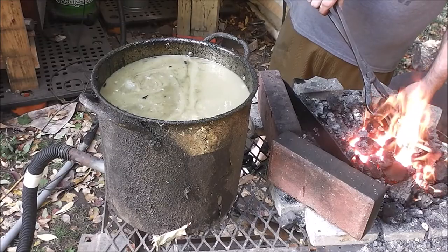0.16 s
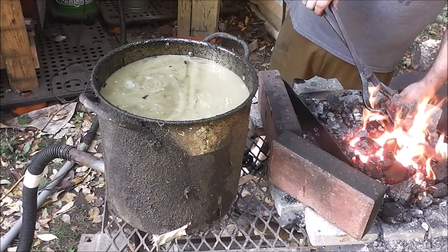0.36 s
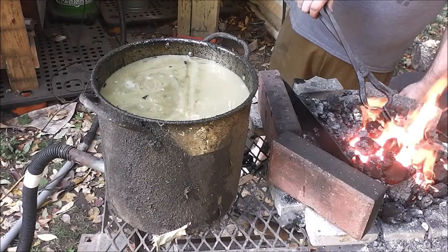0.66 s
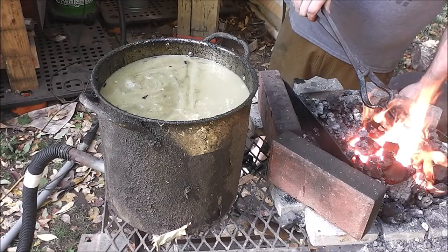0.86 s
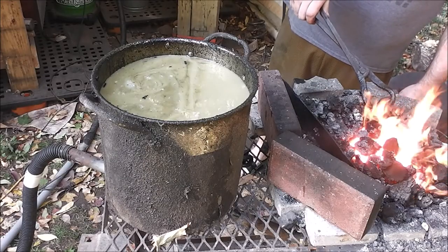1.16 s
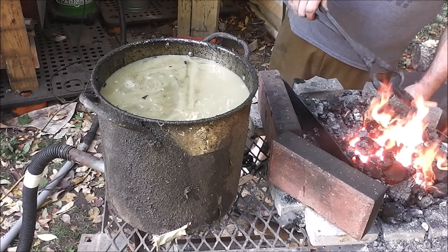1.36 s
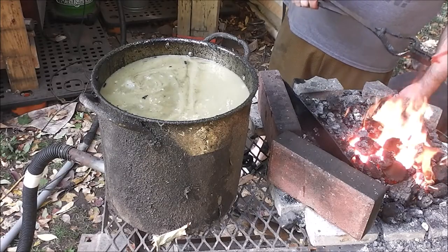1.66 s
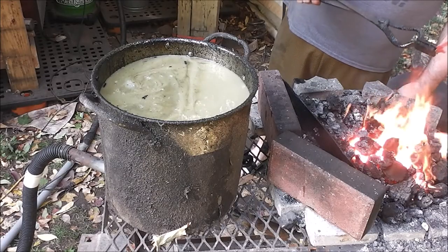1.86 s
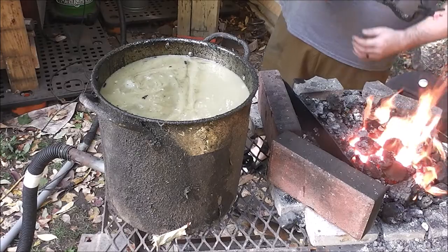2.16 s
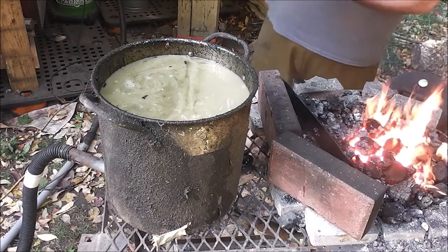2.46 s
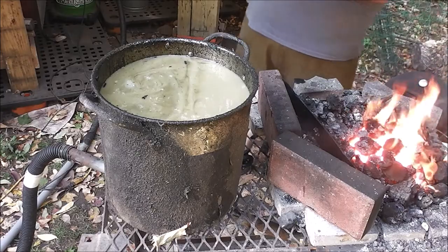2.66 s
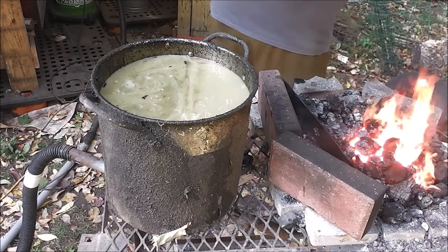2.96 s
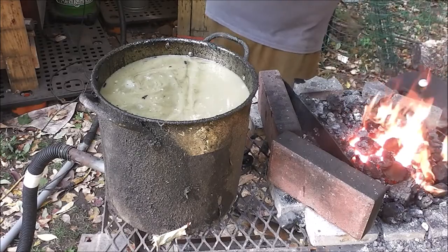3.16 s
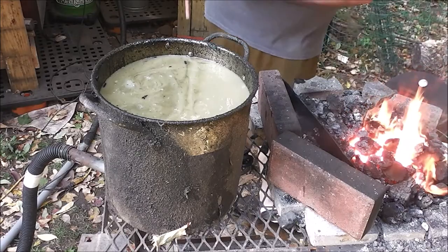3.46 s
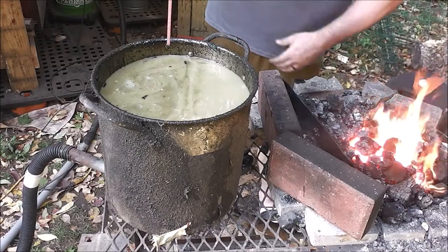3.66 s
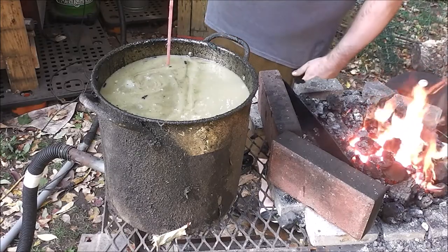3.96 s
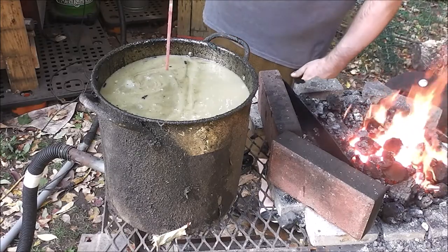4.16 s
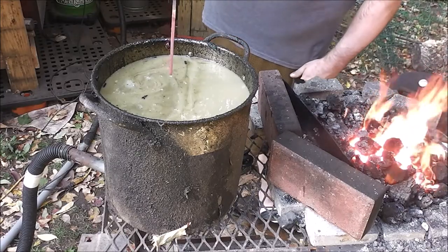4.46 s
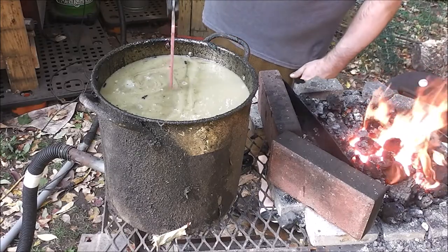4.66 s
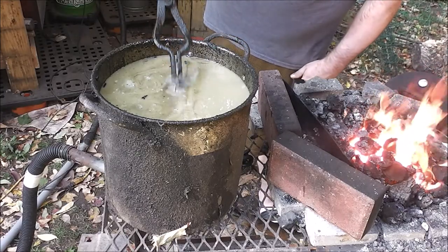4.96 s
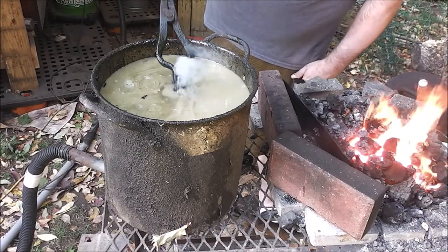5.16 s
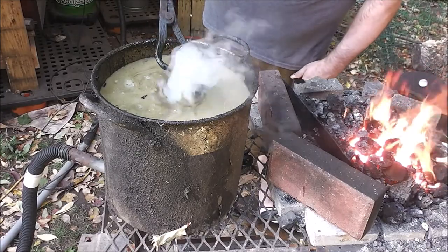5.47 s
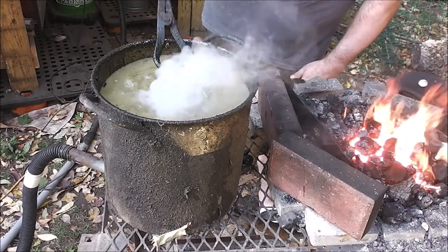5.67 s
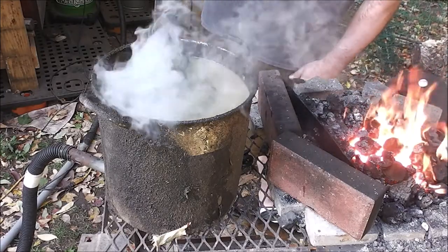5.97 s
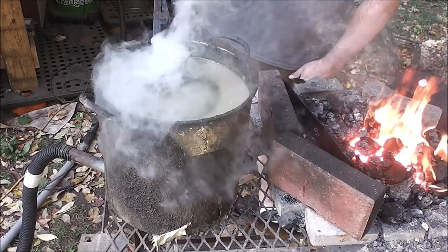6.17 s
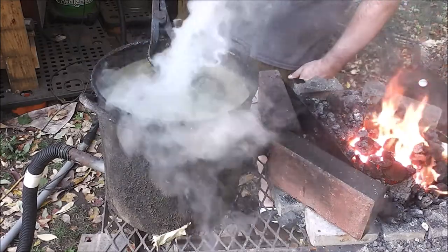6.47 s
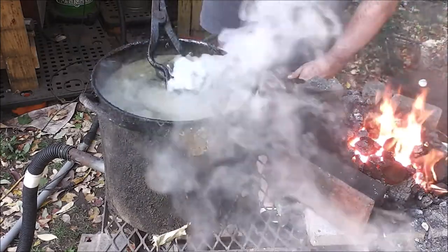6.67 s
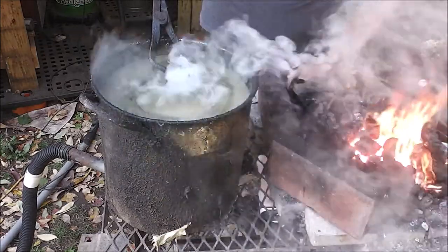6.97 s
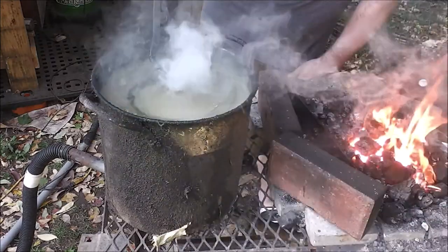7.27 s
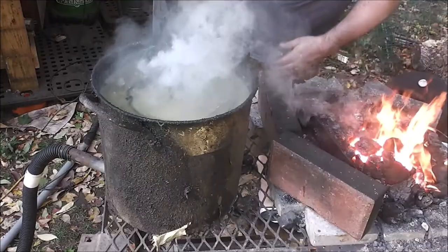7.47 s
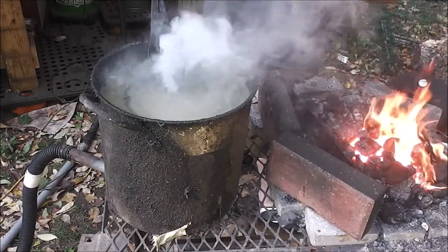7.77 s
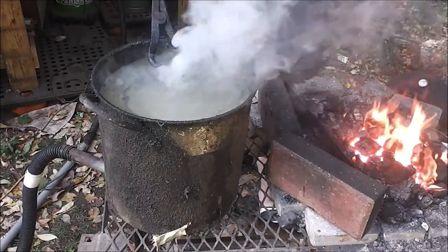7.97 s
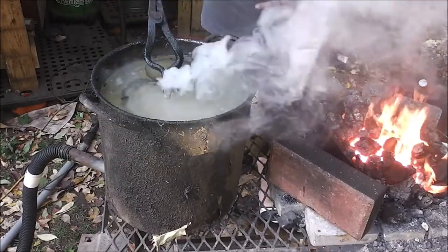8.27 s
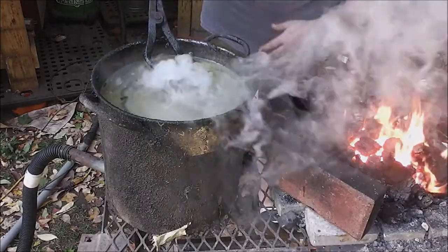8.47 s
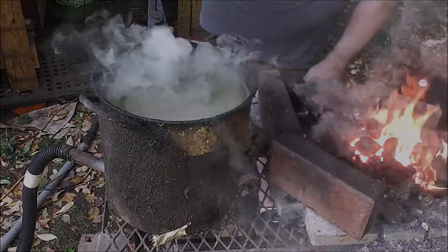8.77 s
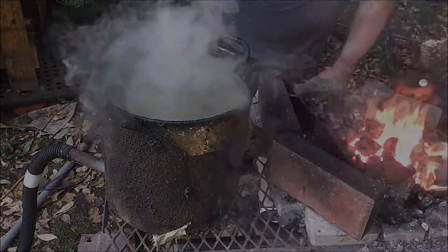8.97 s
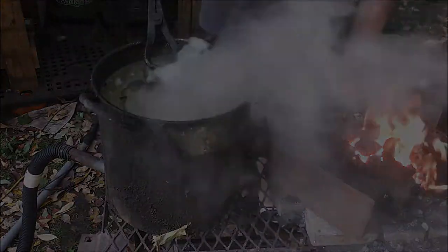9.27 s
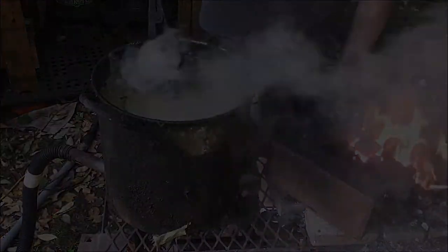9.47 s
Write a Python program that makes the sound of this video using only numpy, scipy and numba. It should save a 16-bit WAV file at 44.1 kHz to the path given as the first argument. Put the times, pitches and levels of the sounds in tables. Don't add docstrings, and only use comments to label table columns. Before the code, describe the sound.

A steady mid-pitched blower tone dominates, barely wavering, over soft air rush and nozzle hiss. After almost five seconds hot metal enters a pot of oil with a small tick, then the oil surges into crisp frying sizzle and dense sharp pops close to the microphones. Dry open-air stereo, gain dipping after the loudest cracks, with a long fade to silence.

```python
import sys
import numpy as np
from scipy import signal
from scipy.fft import rfft, irfft, next_fast_len
from scipy.io import wavfile
from scipy.ndimage import uniform_filter1d
from numba import njit

SR = 44100
rng = np.random.default_rng(int(sys.argv[2]) if len(sys.argv) > 2 else 0)


def dump_mix(stems):
    frames = np.atleast_2d(stems).T
    limited = np.clip(frames, -1, 1)
    pcm = np.round(limited * 32767).astype(np.int16)
    wavfile.write(sys.argv[1], SR, pcm)


def amplitude_ratio(level_db):
    exponent = np.asarray(level_db, float) / 20
    return 10 ** exponent


N = 423801
SIZE = next_fast_len(N)
TIME = np.arange(N) / SR
FREQ = np.arange(1, SIZE // 2 + 2) * SR / SIZE
RUSH_DB = -31.5


def walk(rate_hz):
    hold = int(SR / rate_hz)
    steps = np.repeat(rng.standard_normal(N // hold + 1), hold)
    slewed = uniform_filter1d(uniform_filter1d(steps, hold), hold)
    return 1.3 * slewed[:N]


def shape(points):
    hz, value = np.transpose(points)
    return np.interp(np.log(FREQ), np.log(hz + 1), value)


def colour(noise, points, lo_hz, hi_hz):
    spectrum = rfft(noise, SIZE) * amplitude_ratio(shape(points))
    inside = np.abs(spectrum[..., (FREQ > lo_hz) & (FREQ < hi_hz)]) ** 2
    power = 2 * inside.sum(axis=-1, keepdims=True) / SIZE / N
    return irfft(spectrum, SIZE)[..., :N] / np.sqrt(power)


# (frequency [Hz], left minus right [dB])
LOUDER = [(30, -2), (110, -.9), (200, -.3), (380, -.8), (582, .3), (800, .1), (1200, 1.9), (2000, 2.5),
          (4200, 1.4), (7300, 4), (9300, 4.6), (10300, 6.6), (12300, .3), (15000, -.3)]
# (frequency [Hz], lead of the left [rad])
LEAD = [(0, 0), (200, .1), (580, .33), (1500, .25), (3960, -.1), (7750, 0), (8530, .5), (9500, -.4),
        (11100, -1.5), (13600, -.9), (15400, -.1)]


def microphones(direct, scattered, alike):
    lead = np.interp(FREQ, *np.transpose(LEAD))
    half = amplitude_ratio(shape(LOUDER) / 2) * np.exp(0.5j * lead)
    left = rfft(direct, SIZE)
    right = alike * left + np.sqrt(1 - alike ** 2) * rfft(scattered, SIZE)
    return irfft(np.array([left * half, right / half]), SIZE)[:, :N]


# (time [s], blade level [dB], second harmonic [dB], housing tone [dB], third harmonic [dB])
STANCE = [
    (0, -8, -33, -31, -36.5),
    (.6, -7.5, -29, -31, -39),
    (2.3, -8.1, -40, -33, -37),
    (2.55, -7.7, -25, -35, -37),
    (3.2, -7.5, -29, -34.5, -49),
    (4.1, -7, -28, -37, -40.5),
    (4.85, -8, -30, -35.5, -41),
    (5.4, -8, -34.5, -36.5, -48),
    (7.7, -7, -32, -35.5, -42.5),
    (8.55, -7.5, -29.5, -35.5, -43),
]


def stance():
    shift_s = 0.25
    s, *levels = np.transpose(STANCE)
    held = np.array(levels)[:, np.searchsorted(s[1:], TIME)]
    return uniform_filter1d(held, int(shift_s * SR), mode="nearest")


# (time [s], blade rate [Hz])
SPEED = [
    (0, 580.55),
    (.9, 581.3),
    (2.1, 581.8),
    (3.5, 581.95),
    (4.7, 582.3),
    (5.3, 581.9),
    (7.5, 581.3),
    (8.8, 582.0),
    (9.6, 581.75),
]
# (multiple of blade rate, level over the air rush [dB])
BLADE = [(4, -21), (6, -16), (8, -18), (11, -21), (14, -23), (21, -25)]
# (frequency [Hz], wobble [Hz], level over the air rush [dB])
MOTOR = [(120, 4, -19), (1662, 4, -17), (4519, 3, -18), (4760, 3, -18), (5084, 5, -18)]


def blower_tones():
    housing_ratio = 2.613
    blade_hz = np.interp(TIME, *np.transpose(SPEED))
    turn = 2 * np.pi * np.cumsum(blade_hz + 0.084 * walk(6)) / SR
    blade_db, second_db, housing_db, third_db = stance()
    out = amplitude_ratio(blade_db + 0.12 * walk(7)) * np.sin(turn)
    out += amplitude_ratio(second_db + 0.75 * walk(11)) * np.sin(2 * turn + 0.2 * walk(9.1))
    out += amplitude_ratio(third_db + 2.5 * walk(8)) * np.sin(3 * turn + 0.6 * walk(12))
    out += amplitude_ratio(housing_db + 1.2 * walk(8)) * np.sin(housing_ratio * turn + 0.47 * walk(12))
    for order, db in BLADE:
        out += amplitude_ratio(RUSH_DB + db + 2.9 * walk(4.3)) * np.sin(order * turn + 0.49 * walk(8))
    for hz, wobble_hz, db in MOTOR:
        drift_hz = hz * blade_hz / blade_hz.mean() + wobble_hz * walk(7)
        out += amplitude_ratio(RUSH_DB + db + 2.0 * walk(4.5)) * np.sin(2 * np.pi * np.cumsum(drift_hz) / SR)
    return np.sqrt(2) * out


@njit
def ring(start, hz, cycles, size, count):
    out = np.zeros(count)
    for k in range(len(start)):
        pole = np.exp(hz[k] / SR * (2j * np.pi - 1 / cycles[k]))
        z = size[k] + 0j
        for i in range(start[k], min(count, start[k] + int(6 * cycles[k] * SR / hz[k]))):
            out[i] += z.imag
            z *= pole
    return out


# (time [s], peak level [dB], pitch [Hz], gain dip [dB])
TOUCH = [
    (4.782, -21, 6000, 2),
]
# (time [s], peak level [dB], pitch [Hz], gain dip [dB])
SPITS = [(5.2459, -15.5, 9100, 1.3), (5.3394, -10.2, 8500, 2.8), (5.5035, -16.3, 9000, 1.3),
         (5.689, -10.0, 6200, 2.8), (6.1117, -12.2, 9400, 1.4), (6.2606, -11.1, 11800, 3.4),
         (6.6322, -14.5, 9700, 1.9), (6.6499, -11.6, 10600, 3.4), (6.7815, -13.9, 8000, 1.3),
         (6.7953, -13.3, 9000, 2.8), (6.8129, -14.1, 6700, 2.3), (6.8943, -10.6, 11300, 4.8),
         (6.9162, -11.8, 8000, 1.1), (7.001, -15.8, 9400, 1.7), (7.2837, -11.2, 6100, 1.7),
         (7.3595, -12.6, 9700, 1.6), (7.4619, -11.2, 5400, 2.1), (7.4833, -12, 11700, 2.9),
         (7.542, -11.3, 6300, 3.4), (7.7116, -12, 9600, 3.6), (7.8156, -12.8, 7100, 2.1),
         (7.9368, -11.2, 6500, 2.0), (8.0711, -17.4, 6700, 1.2), (8.1944, -12, 10000, 3),
         (8.3051, -13.8, 9900, 1.9), (8.4273, -11.4, 8300, 2.6), (8.6003, -15.2, 8700, 1.6),
         (9.4232, -11.5, 7900, 2.4), (9.5305, -14, 10500, 3.2), (9.5955, -16, 9100, 1.9)]
# (time [s], pitch [Hz])
POPS = [(5.2956, 10400), (5.3598, 8800), (5.4123, 8100), (5.6262, 6400), (5.7056, 9800), (5.7426, 10000),
        (5.9543, 8400), (6.0352, 6500), (6.0411, 8500), (6.0686, 9400), (6.0827, 9500), (6.188, 9400),
        (6.2907, 7600), (6.4144, 10200), (6.5715, 9000), (6.7159, 6900), (6.9509, 9900), (7.0903, 7200),
        (7.2421, 6800), (7.4323, 12500), (7.6421, 11300), (7.8403, 10000), (8.1517, 6800), (8.4178, 9100),
        (8.6887, 7600), (9.0483, 5400)]


def spits():
    pop_db = -12.5
    stray_from_s = 5.5
    when, size, pitch = rng.random((90, 3)).T
    stray_s = stray_from_s + when * (TIME[-1] - stray_from_s)
    stray = np.c_[stray_s, -14.5 - 6 * size, 5400 + 6200 * pitch]
    loud = [row[:3] for row in TOUCH + SPITS]
    pops = [(s, pop_db, hz) for s, hz in POPS]
    s, db, hz = np.r_[loud + pops, stray].T

    start = (s * SR).astype(np.int64) - 8
    wall_delay, wall_pitch = rng.random((len(s), 2)).T
    wall_start = start + (25 + 50 * wall_delay).astype(np.int64)
    wall_hz = hz * (0.71 + 0.45 * wall_pitch)
    burst = ring(start, 1.2 * hz, np.full(len(s), 0.8), amplitude_ratio(db + 7.0), N)
    burst += ring(start + 3, 0.86 * hz, np.full(len(s), 3.5), amplitude_ratio(db + 6.5), N)
    burst += ring(wall_start, wall_hz, np.full(len(s), 2.5), amplitude_ratio(db + 2.0), N)
    thin = signal.butter(2, 3000, "high", fs=SR, output="sos")
    return signal.sosfilt(thin, burst)


# (frequency [Hz], density [dB per Hz])
SIZZLE = [(500, -52), (1500, -31), (3000, -17.5), (4200, -5.5), (5200, -3.5), (5650, 0), (6100, -4),
          (6900, -13.5), (7900, -3), (8700, -7.5), (10700, 0.5), (12400, -1), (15500, -8.5)]
# (time [s], sizzle level [dB])
BOIL = [
    (5.0, -54),
    (5.12, -35),
    (5.38, -25.5),
    (5.56, -33),
    (6.05, -29),
    (6.5, -31),
    (6.9, -26.5),
    (7.2, -29.5),
    (9.6, -29.5),
]


def sizzle():
    when, pitch, length, size = rng.random((4, 2, 42000))
    size_db = np.minimum(-3.0 * np.log(1 - size), 12) + 7 * pitch
    size_db -= 9.0 * (1 - pitch) * np.clip((5.6 - when * N / SR) / 0.5, 0, 1)
    start = (when * N).astype(np.int64)
    hz = 3300 * 4.9 ** pitch
    cycles = 0.5 + 5.0 * length ** 4
    grains = np.array([ring(start[k], hz[k], cycles[k], amplitude_ratio(size_db[k]), N) for k in range(2)])
    clusters = amplitude_ratio(0.8 * walk(45) + 1.9 * walk(220))
    boil_db = np.interp(TIME, *np.transpose(BOIL))
    direct, scattered = colour(grains * clusters, SIZZLE, 10800, 14000) * amplitude_ratio(boil_db)
    return microphones(direct, scattered, 0.96)


# (frequency [Hz], density [dB per Hz])
RUSH = [(20, -26), (40, -13), (70, -10), (115, -8), (190, -6), (255, -9), (330, -1), (560, -1.5),
        (1000, -4), (1200, -3), (1400, -7), (1800, -5.5), (2400, -17), (6000, -46)]
# (frequency [Hz], density [dB per Hz])
HISS = [(1400, -44), (2400, -13), (3000, -13), (3900, -7.5), (5060, 0.5), (6720, -6), (8050, -4),
        (8640, -7.5), (9400, -6.5), (10200, -5.5), (12000, -6.5), (13500, -14.5), (15700, -19.5)]
# (frequency [Hz], width [Hz], lift [dB])
NOZZLE = [(3210, 90, 1), (3660, 70, 7.5), (4090, 96, 7.5), (4500, 73, 3), (5730, 120, 1.5), (9860, 250, 1)]
# (frequency [Hz], likeness [0-1])
ALIKE = [(30, .0), (60, .4), (100, .98), (500, .98), (1500, .88), (2400, .74), (3200, .89), (5200, .87),
         (7300, .57), (9300, .4), (11300, .64), (13500, .45), (15000, .7)]


def blower_air():
    rush = colour(rng.standard_normal((2, N)), RUSH, 150, 450) * amplitude_ratio(RUSH_DB + 0.3 * walk(5))
    lift_db = sum(db / (1 + (2 * (FREQ - hz) / width) ** 2) for hz, width, db in NOZZLE)
    jet = irfft(rfft(rng.standard_normal((2, N)), SIZE) * amplitude_ratio(lift_db), SIZE)
    hiss_db = -28.5 - 0.2445 * TIME
    hiss = colour(jet, HISS, 3830, 5176) * amplitude_ratio(hiss_db + 0.5 * walk(8.3))
    direct, scattered = rush + hiss
    return microphones(direct, scattered, shape(ALIKE))


def scene():
    direct = blower_tones() + spits()
    return microphones(direct, direct, 1) + sizzle() + blower_air()


def top_cut(x):
    return signal.sosfilt(signal.butter(12, 15850, fs=SR, output="sos"), x)


def record(dry):
    recover_s, pop_dip_db = 0.065, 0.4
    fade_from_s, fade_to_s, fade_power = 6.5, 10.023, 1.16
    dips = [(row[0], row[3]) for row in TOUCH + SPITS]
    dips += [(s, pop_dip_db) for s, _ in POPS]
    s, dip_db = np.transpose(dips)
    drops = np.zeros(N)
    drops[(s * SR).astype(np.int64) + 12] = dip_db
    duck_db = signal.lfilter([1], [1, -np.exp(-1 / (recover_s * SR))], drops)
    fade = np.clip((fade_to_s - TIME) / (fade_to_s - fade_from_s), 0, 1) ** fade_power
    mix = np.clip(dry * amplitude_ratio(-duck_db), -1, 1) * fade
    return top_cut(mix)


dry = scene()
out = record(dry)
dump_mix(out)
```